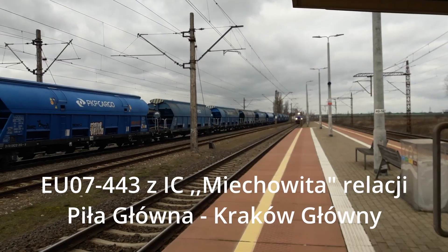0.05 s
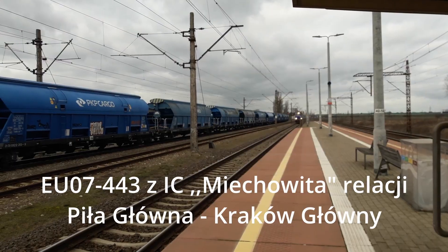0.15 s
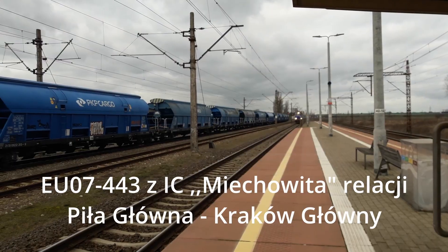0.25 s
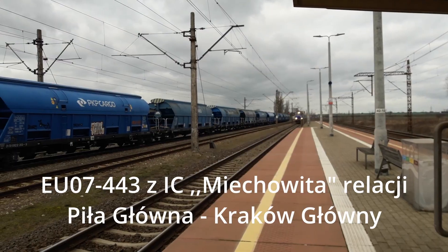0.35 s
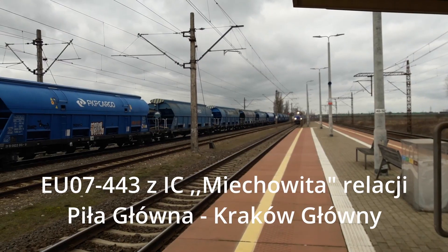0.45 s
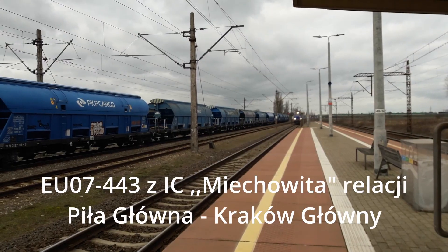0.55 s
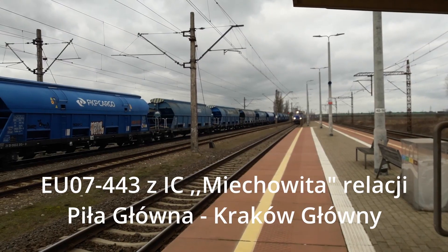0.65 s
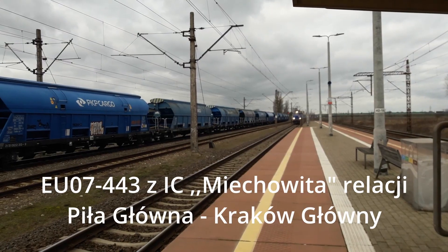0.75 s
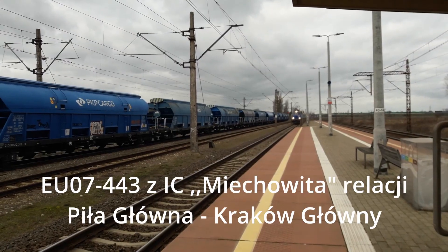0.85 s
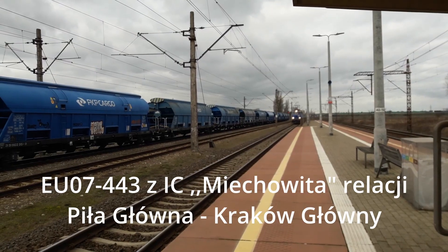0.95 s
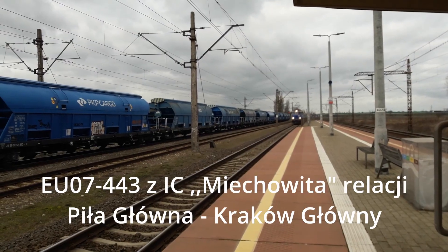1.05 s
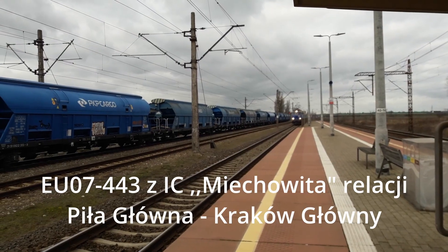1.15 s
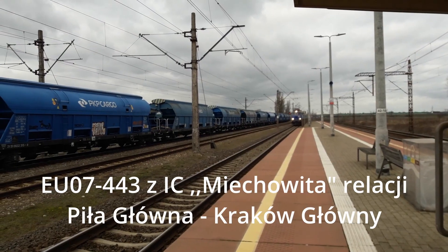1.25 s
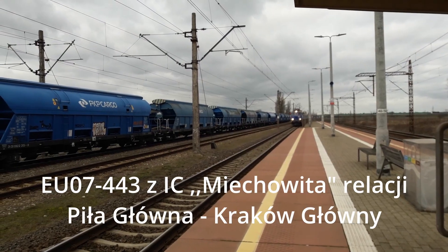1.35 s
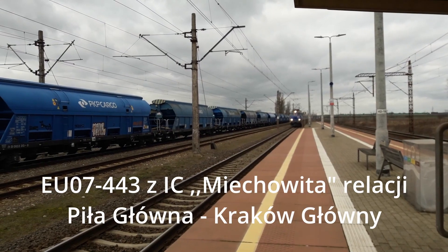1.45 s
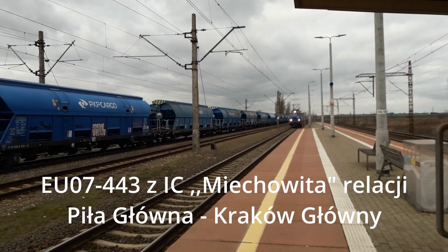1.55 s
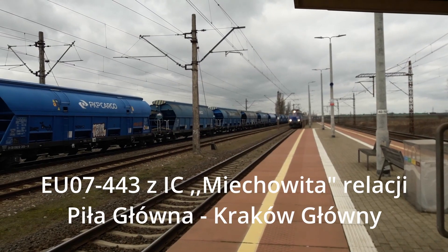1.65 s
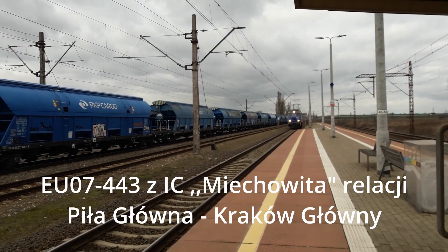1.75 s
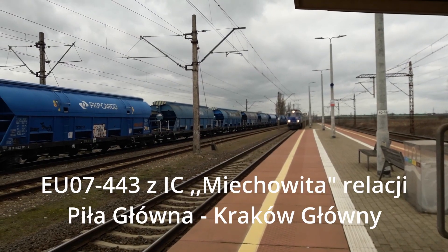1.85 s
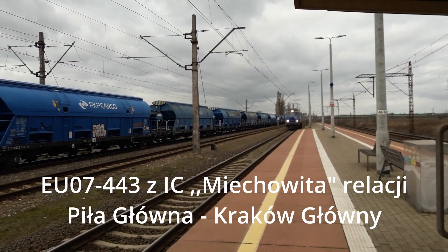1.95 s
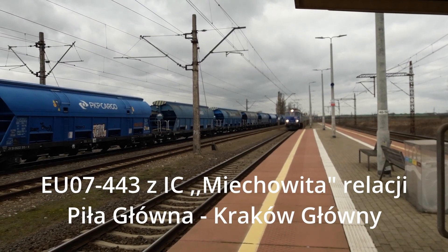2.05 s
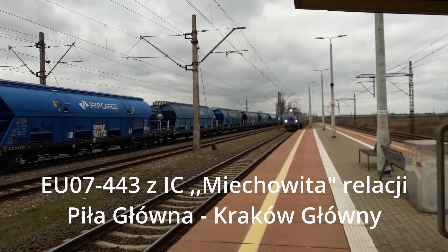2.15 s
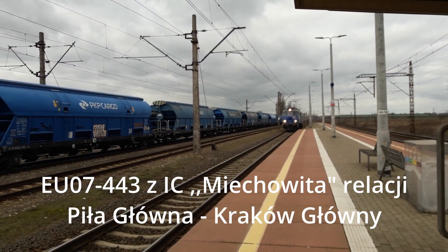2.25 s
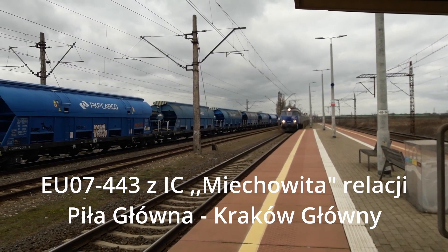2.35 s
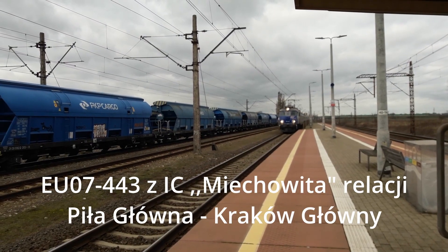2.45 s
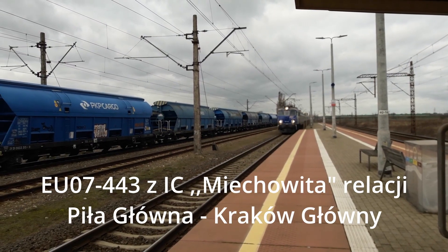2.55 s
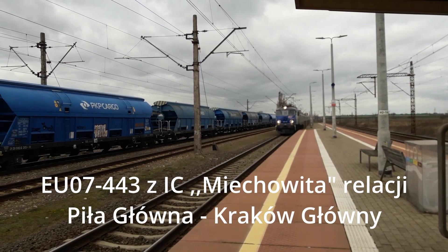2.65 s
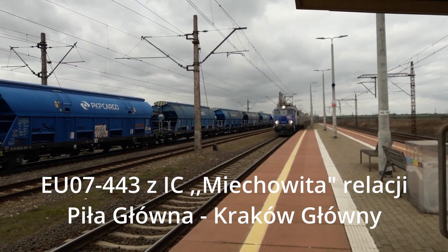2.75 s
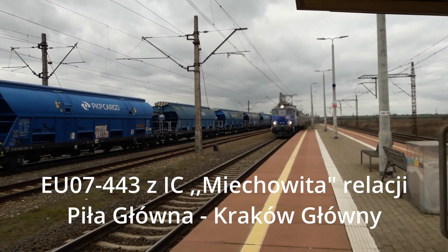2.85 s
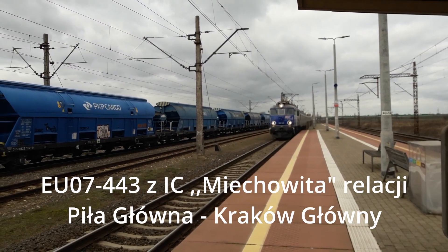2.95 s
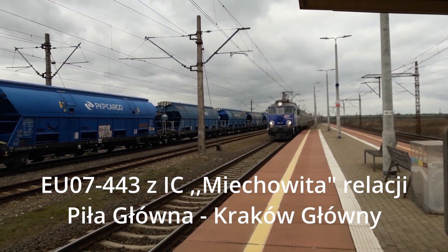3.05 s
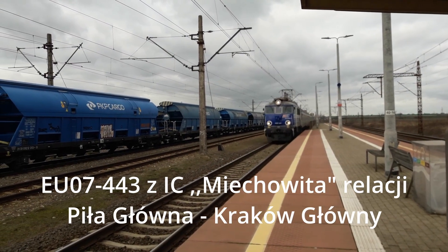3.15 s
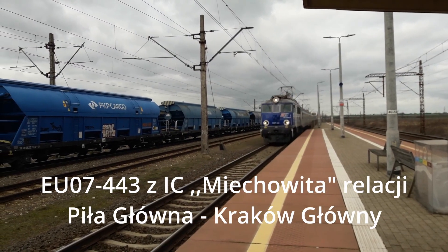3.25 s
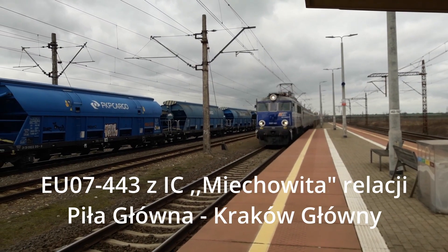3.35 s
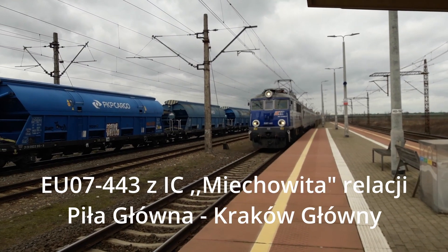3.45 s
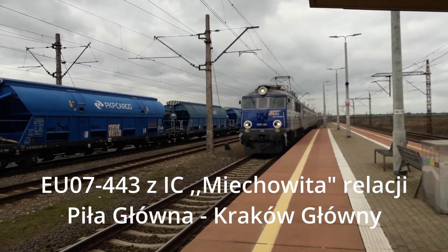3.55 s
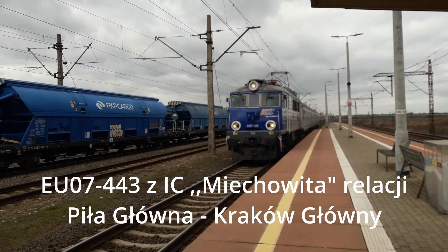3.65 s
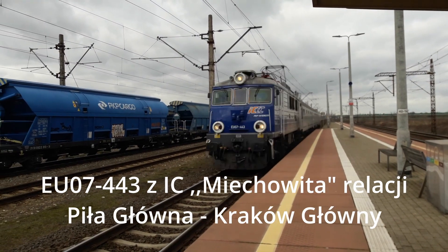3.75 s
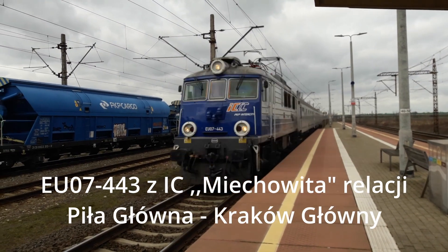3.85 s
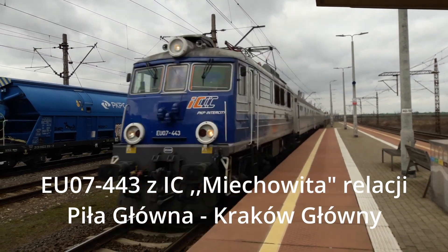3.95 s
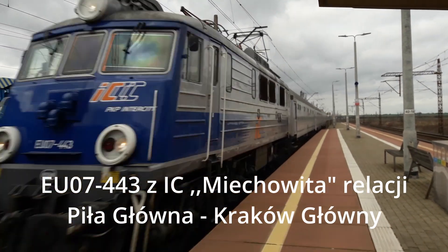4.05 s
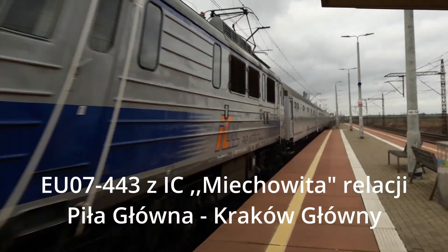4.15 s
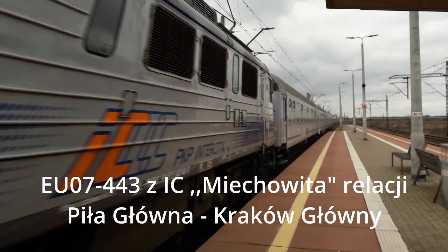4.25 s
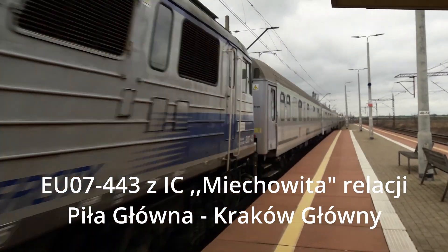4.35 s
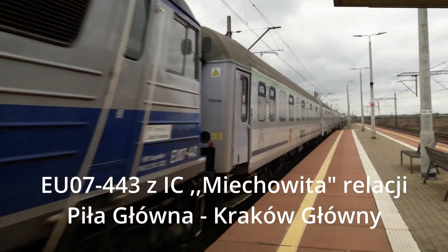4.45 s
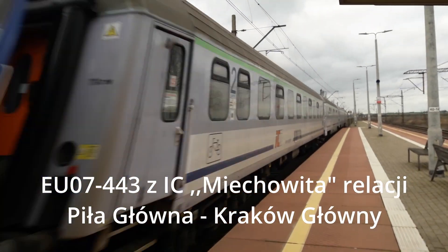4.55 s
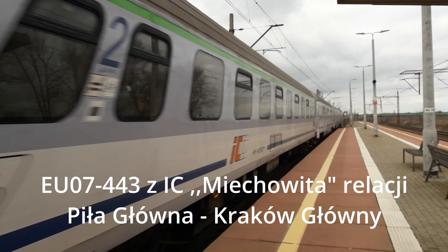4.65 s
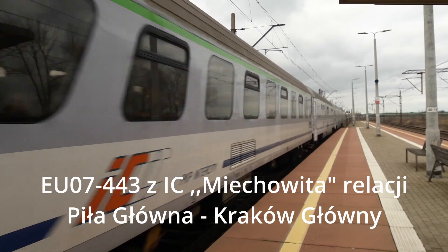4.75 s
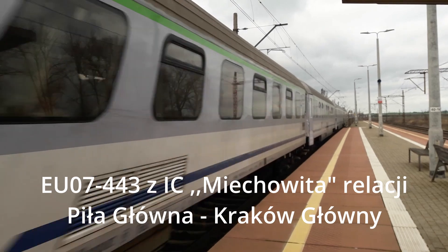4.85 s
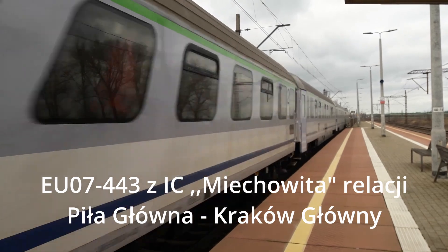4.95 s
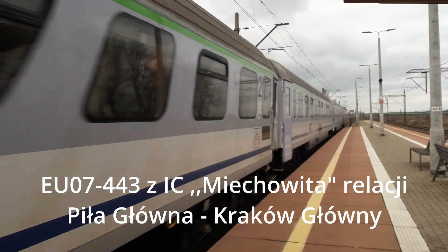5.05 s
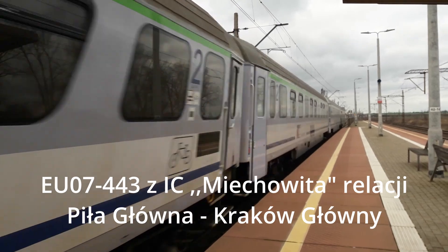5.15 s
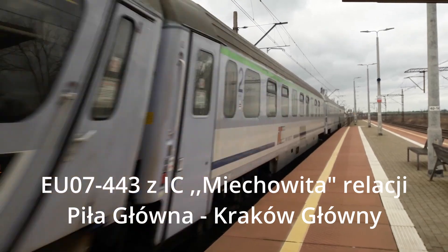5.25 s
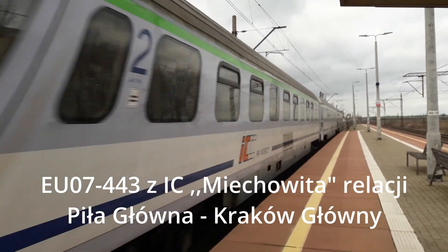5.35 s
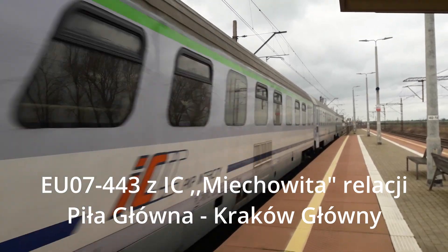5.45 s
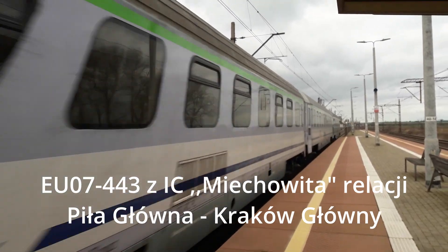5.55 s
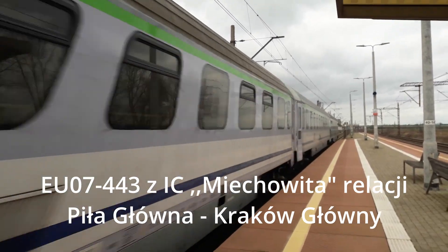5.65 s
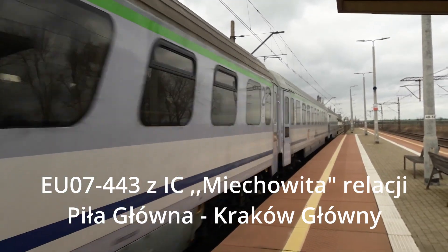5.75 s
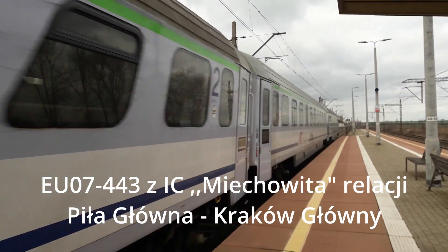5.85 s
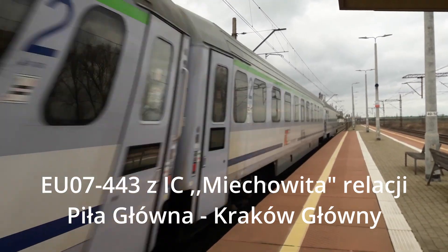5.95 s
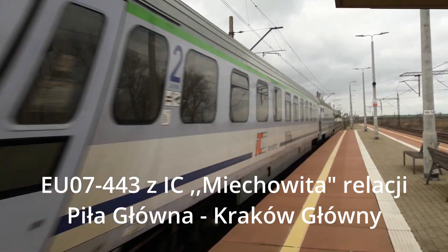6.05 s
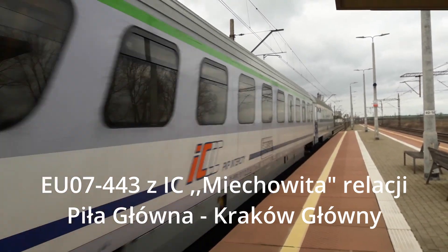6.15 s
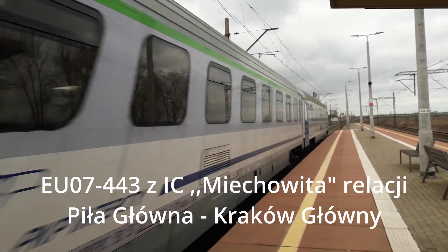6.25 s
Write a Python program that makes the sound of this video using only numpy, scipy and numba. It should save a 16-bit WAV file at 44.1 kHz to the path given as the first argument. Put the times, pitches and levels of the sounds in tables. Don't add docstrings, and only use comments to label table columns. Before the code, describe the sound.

Close trackside sound outdoors, nearly mono. First only soft wind bumps and a faint, glassy hiss from the rails, building steadily for about four seconds. Then a fast passenger train arrives: a sudden broad roar, deep locomotive weight, short treble hiss overhead and bands of ringing wheels. The roar dips and swells as coach bogies pass, and ragged slipstream bursts distort and briefly duck the sound. It ends with the train still passing.

```python
import sys
import numpy as np
from scipy import signal
from scipy.fft import rfft, irfft
from scipy.io import wavfile
from scipy.ndimage import uniform_filter1d, minimum_filter1d
from numba import njit

SR = 44100
rng = np.random.default_rng(int(sys.argv[2]) if len(sys.argv) > 2 else 0)


def wrap_up_sound(samples):
    columns = np.atleast_2d(samples).T
    tamed = np.clip(columns, -1, 1)
    steps = np.round(tamed * 32767).astype(np.int16)
    wavfile.write(sys.argv[1], SR, steps)


def field_ratio(decibels):
    return 10 ** (np.asarray(decibels, dtype=float) / 20)


N = 277830
TIME = np.arange(N) / SR
FREQS = np.arange(N // 2 + 1) * SR / N
LOCO_S, LOCO_HALF_S = 4.463, .35


def curves(table):
    s, *columns = np.transpose(table)
    return [np.interp(TIME, s, column) for column in columns]


def unit(x):
    return x / np.sqrt(np.mean(x ** 2))


def rise(s, span_s):
    return 1 / (1 + np.exp(-(TIME - s) / span_s))


def bump(s, half_s):
    return 1 / (1 + ((TIME - s) / half_s) ** 4)


def walk(rate_hz):
    hold = int(SR / rate_hz)
    steps = np.repeat(rng.standard_normal(N // hold + 1), hold)
    return 1.3 * uniform_filter1d(uniform_filter1d(steps, hold), hold)[:N]


def colour(points):
    hz, db = np.transpose(points)
    return field_ratio(np.interp(np.log(FREQS + 1), np.log(hz), db, left=-90, right=-120))


def living(gain, shared_db, own_db, rate_hz):
    spectrum = rfft(rng.standard_normal(N)) * gain
    swell = walk(rate_hz / 2)
    place = 2 * np.log2((FREQS + 1) / 20)
    out = 0
    for k in range(20):
        mask = np.cos(np.pi / 2 * np.clip(place - k, -1, 1)) ** 2
        level_db = shared_db * swell + own_db * walk(rate_hz)
        out = out + field_ratio(level_db) * irfft(spectrum * mask, N)
    return out


def band(x, low_hz, high_hz):
    return irfft(rfft(x) * ((FREQS > low_hz) & (FREQS < high_hz)), N)


@njit
def svf(x, hz, width):
    y, b, l = np.empty(len(x)), 0., 0.
    for i in range(len(x)):
        g, k = np.tan(np.pi * hz[i] / SR), width / hz[i]
        v = (b + g * (x[i] - l)) / (1 + g * (g + k))
        b, l, y[i] = 2 * v - b, l + 2 * g * v, k * v
    return y


def ring(hz, width_hz):
    centre_hz = hz + np.zeros(N)
    once = svf(rng.standard_normal(N), centre_hz, 1. * width_hz)
    return unit(svf(once, centre_hz, 1. * width_hz))


# pitch_hz, width_hz, level_db
MIC_HISS = (14500, 3000, -68)


def mic_hiss():
    hz, width_hz, db = MIC_HISS
    return field_ratio(db) * ring(hz, width_hz)


# pitch_hz, level_db (per Hz)
WIND_COLOUR = [(25, -17.5), (60, -1), (112, 2.5), (184, -3), (289, -16.5), (413, -37), (700, -47.5),
               (1500, -80)]
# peak_s, half_length_s, level_db
GUSTS = [(0, 0.025, -32), (0.163, 0.065, -32), (.47, .04, -33), (0.593, 0.054, -32), (.72, 0.031, -34),
         (.85, .11, -31), (0.985, 0.05, -29.5), (1.198, 0.061, -39.5), (1.437, 0.062, -32),
         (1.57, 0.035, -37), (1.652, 0.032, -22.5), (1.803, 0.0355, -27.5), (2.067, .09, -31),
         (2.272, 0.064, -31), (2.509, 0.037, -31), (2.706, 0.046, -33), (3.868, 0.078, -26),
         (4.135, .07, -18.5), (4.47, .07, -30), (4.652, 0.046, -15.5), (5.165, .025, -23), (5.35, .07, -27),
         (5.455, .02, -22), (5.56, .05, -19), (5.65, 0.025, -19), (5.753, .018, -11), (5.811, 0.033, -19),
         (5.93, .035, -25), (6.08, .07, -29), (6.257, 0.024, -27)]


def gusting_air():
    gusts = sum(field_ratio(db) * np.exp(-((TIME - s) / half_s) ** 2 / 2) for s, half_s, db in GUSTS)
    lull_db = -40.5 + 6.5 * rise(2.38, .15)
    level_db = 20 * np.log10(np.hypot(gusts, field_ratio(lull_db)))
    rasp_db = -11 - 0.31 * (level_db + 33)
    rasp_db += 14 * rise(3.6, 0.26)
    rasp_db += 12 * bump(LOCO_S, LOCO_HALF_S)
    rumble = unit(living(colour(WIND_COLOUR), 1.15, 2.4, 30))
    rasp = ring(380, 538)
    return field_ratio(level_db - 0.2) * rumble + field_ratio(level_db + rasp_db - 10.5 + 4.7 * walk(60)) * rasp


def burst(out, s, db, hz, snap_db):
    span = slice(max(int((s - .03) * SR), 0), int((s + .03) * SR))
    since = TIME[span] - s
    skew = rng.uniform(-1.6, 1)
    swing = np.cos(2 * np.pi * hz * since + .6 * skew) * np.exp(-(hz * since / .42) ** 2)
    snap = np.cos(2 * np.pi * 330 * since) * np.exp(-(since / .0013) ** 2)
    out[span] -= field_ratio(db - 3.5) * (swing + field_ratio(snap_db - 1.5) * snap)


# burst_s, peak_db, pitch_hz
THUMPS = [(0.005, -12, 135), (0.106, -19, 126), (0.127, -15, 154), (0.143, -15, 216), (0.161, -10, 175),
          (0.172, -5.5, 214), (0.216, -15, 238), (0.544, -18, 144), (0.605, -15, 152),
          (0.717, -12.5, 132.4), (0.766, -23, 130), (0.903, -18, 134), (0.963, -19, 128), (0.987, -12, 124),
          (0.998, -11.5, 170), (1.023, -16, 213), (1.402, -22, 200), (1.578, -16, 117), (1.63, -17, 172),
          (1.641, -8, 200), (1.671, -18, 91), (1.935, -18, 142), (1.966, -15.5, 150), (2.124, -23, 110),
          (2.256, -13, 125), (2.476, -16.5, 118), (2.508, -13, 124), (2.526, -10, 114)]
# burst_s, peak_db, pitch_hz
BLOWS = [(3.78, -7, 129), (4.585, -2, 217), (4.607, 2, 180), (4.63, -3, 220), (4.645, -6, 256),
         (4.664, -1, 253), (4.702, -3, 193), (5.159, -11, 200), (5.43, -3.5, 208), (5.451, -8, 168),
         (5.46, -7.5, 143), (5.51, -4.5, 248), (5.529, -5, 146), (5.578, -4, 202), (5.626, -4, 290),
         (5.641, -9, 108), (5.654, -5, 170), (5.74, 3.5, 120), (5.75, 1, 109), (5.762, -3.5, 176),
         (5.785, -10, 248), (5.796, -3, 248), (5.816, -7.5, 109), (5.847, -9, 145), (6.048, -13, 154)]


def eddies():
    out = np.zeros(N)
    gaps_s = np.diff([row[0] for row in THUMPS], prepend=0)
    for (s, db, hz), gap_s in zip(THUMPS, gaps_s):
        alone = gap_s > .04
        burst(out, s, db, hz, -13 + 5.5 * alone)
    for s, db, hz in BLOWS:
        burst(out, s, db, hz, -7)
    return out


def wind():
    low_cut = signal.butter(2, 45, "high", fs=SR, output="sos")
    return signal.sosfilt(low_cut, gusting_air() + eddies())


# start_s, end_s, low_hz, high_hz, level_db
BUFFETS = [(4.585, 4.75, 54, 550, -13), (5.42, 5.69, 80, 970, -22), (5.73, 5.85, 53, 1000, -23),
           (5.14, 5.19, 66, 920, -20)]


def slipstream():
    out = 0
    for start_s, end_s, low_hz, high_hz, db in BUFFETS:
        gate = np.clip(np.minimum(TIME - start_s, end_s - TIME) / .008, 0, 1)
        fade_db = 8.0 * np.clip((TIME - start_s) / (end_s - start_s), 0, 1) ** 2
        slope = (FREQS > low_hz) / (1 + (FREQS / 140) ** 0.47) / (1 + (FREQS / high_hz) ** 4)
        noise = unit(irfft(rfft(rng.standard_normal(N)) * slope, N))
        out = out + field_ratio(db + 2.0 * walk(50) - fade_db) * gate * noise
    return out


# nearest_s, half_length_s, pitch_hz, width_hz, level_db
ARC = (4.1, .14, 15100, 2600, -49)
# nearest_s, half_length_s, pitch_hz, width_hz, level_db
GAP_HISS = (5.41, .07, 14200, 6000, -51)


def passing_hisses():
    out = 0
    for s, half_s, hz, width_hz, db in (ARC, GAP_HISS):
        out = out + field_ratio(db) * ring(hz, width_hz) * bump(s, half_s)
    return out


# time_s, level_db
RAILS = [(0, -36.5), (.5, -35.5), (1.1, -34), (1.5, -31.5), (2.2, -28.5), (2.7, -26), (3.4, -21),
         (4.0, -19.5), (4.25, -15), (4.5, -17), (4.75, -21.5), (5.15, -34.5), (5.6, -38), (6.3, -27)]
# pitch_hz, width_hz, level_db
RAIL_MODES = [(737, 80, -8), (620, 164, -12), (873, 250, -17), (1074, 22, -1), (1168, 48, 1), (1245, 75, 1),
              (1383, 128, -1.5), (1611.5, 290, -10), (1912, 220, -7.5), (2122, 271, -10), (2590, 260, -22),
              (3530, 1500, -26.5), (3970, 570, -25.5), (4630, 310, -25.5), (5570, 330, -25.5)]
# pitch_hz, level_db (per Hz)
RAIL_TREBLE = [(5000, -26), (5900, -32), (6200, -41), (6620, -12.5), (7300, -15), (7680, -37.5),
               (8150, -23), (8480, -8), (9300, -10.5), (9550, -4), (9850, -14), (11500, -23), (13700, -35),
               (15800, -35)]
# pitch_hz, width_hz, level_db (share)
RAIL_WHISTLE = (9545, 125, -6.5)


def rail_song():
    out = 0
    for hz, width_hz, db in RAIL_MODES:
        waver = np.clip(1 + .006 * walk(4), .9, 1.1)
        out = out + field_ratio(db + 0.67 * walk(4.95)) * np.sqrt(width_hz) * ring(hz * waver, width_hz)
    return unit(out)


def rail_sizzle():
    far = 1 - rise(1.0, .3)
    sizzle = unit(living(colour(RAIL_TREBLE), 0.48, 0.71, 14))
    sizzle -= .75 * rise(4.15, .1) * band(sizzle, 6300, 7700)
    sizzle -= 0.36 * far * band(sizzle, 8200, 9000)
    hz, width_hz, db = RAIL_WHISTLE
    whistle_db = db + 3.5 * far - 5 * rise(4.2, .05) + .8 * walk(6)
    return sizzle + field_ratio(whistle_db) * ring(hz * (1 + .002 * walk(5)), width_hz)


def rails():
    level_db, = curves(RAILS)
    treble_db = -6 - 5 * rise(3, 0.41)
    return field_ratio(level_db) * (field_ratio(1.0) * rail_song() + field_ratio(treble_db - 1.5) * rail_sizzle())


# time_s, level_db
ROAR = [(0, -52.5), (.7, -44.5), (1.5, -43), (2.8, -34), (3.7, -26), (4.03, -24), (4.14, -17),
        (4.33, -21.5), (4.6, -22.5), (4.72, -25), (4.96, -31), (5.25, -25), (5.51, -24), (5.65, -28),
        (5.76, -28.5), (5.88, -23.5), (6.11, -22), (6.3, -24)]
# pitch_hz, level_db (per Hz)
ROAR_COLOUR = [(40, -39), (120, -8.5), (250, -7.5), (450, -11.5), (710, -2.5), (1230, -5), (2120, -4),
               (2460, -10.5), (4110, -15.5), (6530, -23.5), (7300, -24.5), (9400, -17.5), (11800, -39.5),
               (15800, -45.5)]


def roar():
    level_db, = curves(ROAR)
    over_db = level_db + 25
    loco = bump(LOCO_S, LOCO_HALF_S)
    rumble_db = np.minimum(0.5 - .7 * over_db, 7)
    rumble_db += 6 * loco
    hiss_db = np.minimum(-17.5 - .4 * over_db, -9.5)
    hiss_db -= 5.5 * loco
    hiss_db += 4.5 * bump(4.04, .13)
    hiss_db -= 9 * (1 - rise(1.1, 0.29))

    gain = colour(ROAR_COLOUR)
    low = 1 / (1 + (FREQS / 1300) ** 4)
    top = 1 / (1 + (7000 / (FREQS + 1)) ** 8)
    rumble = unit(living(gain * np.sqrt(low), 0.136, 2.1, 7))
    rumble = rumble - 0.28 * rise(4.64, .03) * band(rumble, 480, 720)
    middle = unit(living(gain * np.sqrt(np.clip(1 - low - top, 0, 1)), 0.13, 0.8, 14))
    hiss = unit(living(gain * np.sqrt(top), 0.47, 0.46, 20))
    near_db = -9.0 * (1 - rise(3.2, 0.28))
    mix = field_ratio(8.5) * middle + field_ratio(rumble_db + 5.5) * rumble + field_ratio(hiss_db + 14.0) * hiss
    return field_ratio(level_db + near_db) * mix


# nearest_s, half_length_s, coming_hz, leaving_hz,
# level_db
WHEELS = [(4.19, 0.18, 2220, 2170, -13), (4.4, 0.24, 2190, 1760, -11), (4.33, 0.23, 1410, 1500, -17),
          (3.51, 0.67, 142, 160, -32.5), (4.17, 0.17, 260, 232, -14.5), (4.83, 0.12, 1560, 1500, -17.5),
          (5.29, 0.2, 1720, 1600, -16.5), (5.94, 0.27, 1750, 1570, -16.5), (6.17, 0.14, 2100, 1910, -20),
          (6.26, 0.099, 1470, 1390, -17.5), (4.308, 0.093, 735, 590, -14.5), (4.51, 0.141, 1680, 1000, -16),
          (4.41, 0.17, 254, 256, -17.5), (5.25, 0.16, 1710, 1780, -23), (5.22, 0.15, 1070, 940, -23.5),
          (4.42, 0.15, 3500, 2950, -24.5), (3.88, 0.29, 540, 500, -27.5), (5.55, 0.12, 850, 480, -24.5),
          (4.85, 0.13, 1930, 1900, -27)]
# nearest_s, half_length_s, coming_hz, leaving_hz, width_hz, level_db
GEARS = (4, 0.47, 750, 721, 48, -24)


def wheels():
    ringers = [GEARS]
    for s, half_s, coming_hz, leaving_hz, db in WHEELS:
        width_hz = 165 + 0.63 * abs(coming_hz - leaving_hz)
        ringers.append((s, half_s, coming_hz, leaving_hz, width_hz, db))
    out = 0
    for s, half_s, coming_hz, leaving_hz, width_hz, db in ringers:
        coming = (1 - np.tanh((TIME - s) / half_s)) / 2
        hz = leaving_hz + (coming_hz - leaving_hz) * coming
        out = out + field_ratio(db + 1.3 * walk(20)) * ring(hz, width_hz) * bump(s, half_s)
    return out


def scene():
    air = mic_hiss() + wind() + slipstream()
    train = passing_hisses() + rails() + roar() + wheels()
    return np.tile(air + train, (2, 1))


# centre_s, half_length_s, level_db
DUCKS = [(4.31, .025, -2.5), (4.62, .02, -3.5), (5.742, .012, -4)]


def gain_control(x):
    return x * field_ratio(sum(db * bump(s, half_s) for s, half_s, db in DUCKS))


@njit
def follow(x, release):
    e, y = 0., np.empty(len(x))
    for i in range(len(x)):
        e = max(x[i], e + (x[i] - e) * release)
        y[i] = e
    return y


def limiter(x):
    ahead = -minimum_filter1d(-np.abs(x), size=441)
    peak = follow(ahead, 1 / (.06 * SR))
    gain = np.minimum(1, field_ratio(0.5) / (peak + 1e-9)) ** 0.78
    return np.clip(x * uniform_filter1d(gain, size=221), -.97, .97)


# centre_s, low_hz, high_hz
STEREO_FLECKS = [(2.806, 6890, 8270), (2.806, 11110, 12320), (2.807, 4220, 5170), (2.875, 11800, 13700),
                 (3.363, 8870, 10340), (3.503, 4680, 5680), (3.504, 11020, 12400), (3.505, 8960, 10340),
                 (3.785, 15000, 15760), (3.877, 4620, 6230), (4.315, 12490, 14380), (4.316, 4130, 5250),
                 (4.316, 6290, 7450), (4.317, 10340, 11630), (4.784, 11710, 13010), (5.081, 11900, 13700),
                 (5.083, 6890, 8960), (5.246, 13870, 15760), (5.456, 8270, 9730), (5.457, 4100, 5680),
                 (6.106, 7580, 9040), (6.107, 5680, 6890)]


def stereo_flecks(x):
    side = np.zeros(N)
    for s, low_hz, high_hz in STEREO_FLECKS:
        window = np.cos(np.pi / 2 * np.clip(np.abs(TIME - s) / .01 - .7, 0, 1)) ** 2
        level = np.sqrt(uniform_filter1d(band(x, low_hz, high_hz) ** 2, size=2048) + 1e-18)
        side += window * level * unit(band(rng.standard_normal(N), low_hz, high_hz))
    return field_ratio(-2.5) * side


def roll_off(x):
    return signal.sosfilt(signal.butter(12, 17060, fs=SR, output="sos"), x)


def record(dry):
    x = limiter(gain_control(dry[0]))
    band_edge = signal.ellip(16, .2, 90, 15730, fs=SR, output="sos")
    x = signal.sosfilt(band_edge, x)
    side = stereo_flecks(x)
    return roll_off(np.array([x + side, x - side]))


dry = scene()
out = record(dry)
wrap_up_sound(out)
```